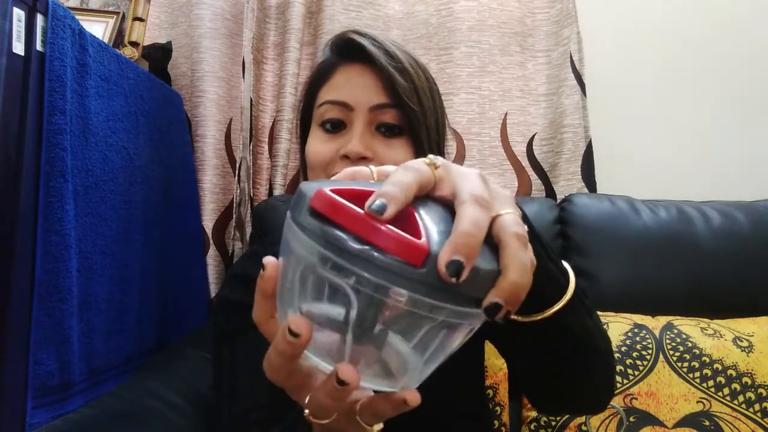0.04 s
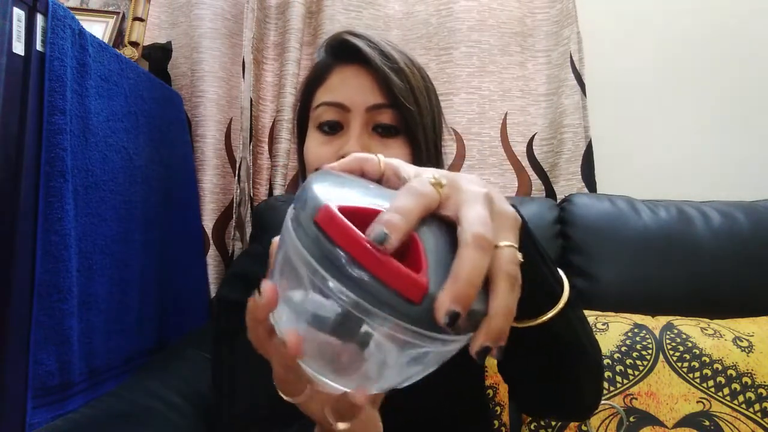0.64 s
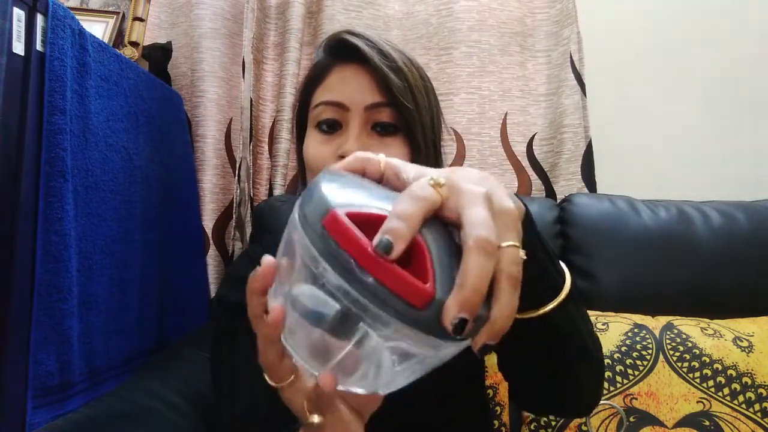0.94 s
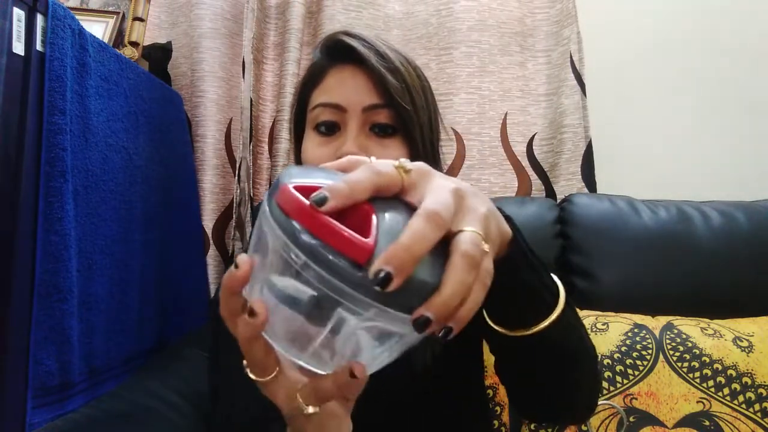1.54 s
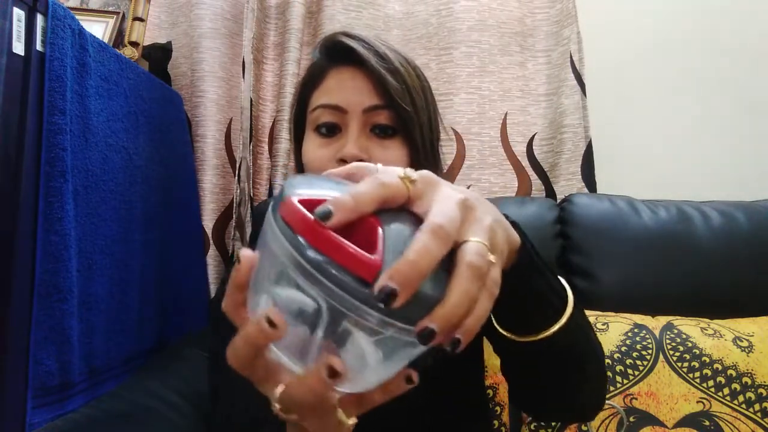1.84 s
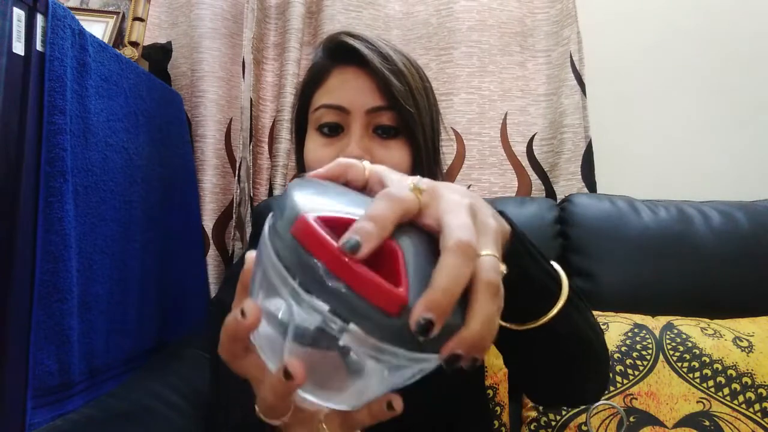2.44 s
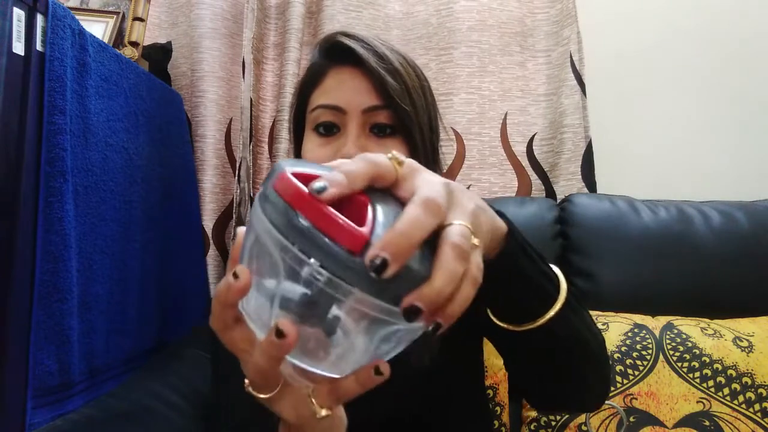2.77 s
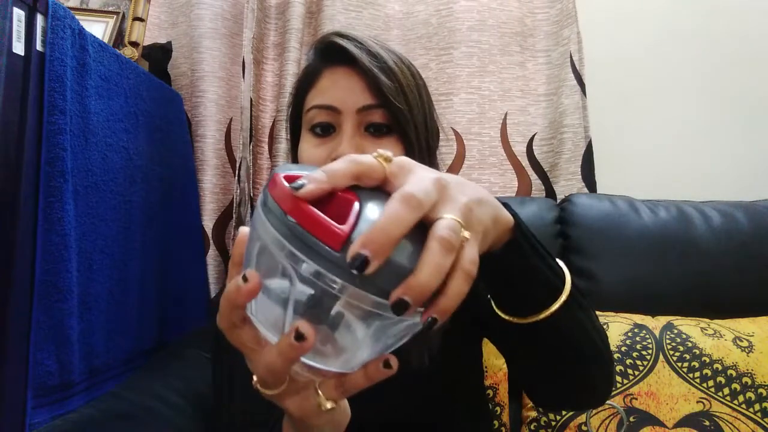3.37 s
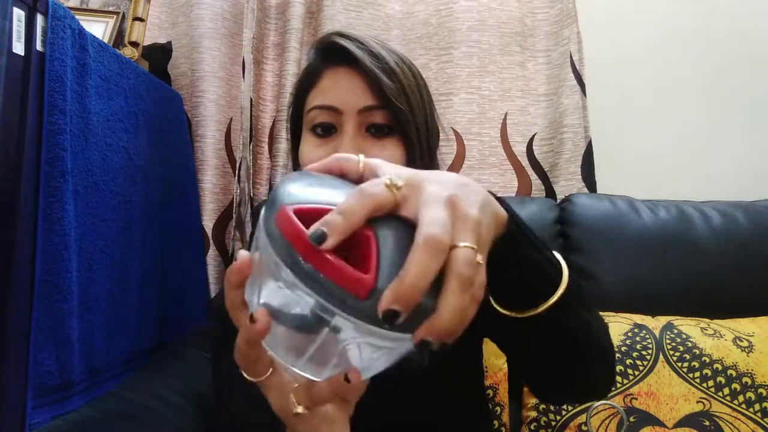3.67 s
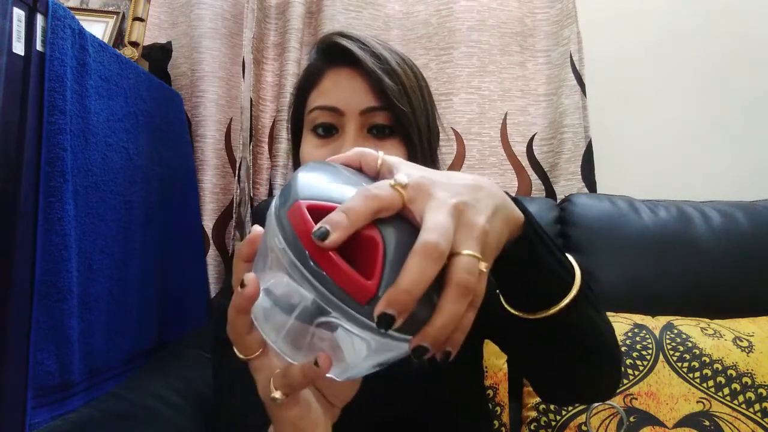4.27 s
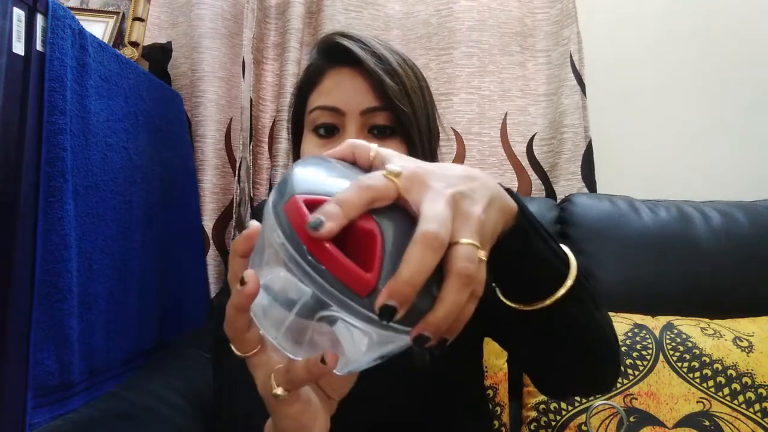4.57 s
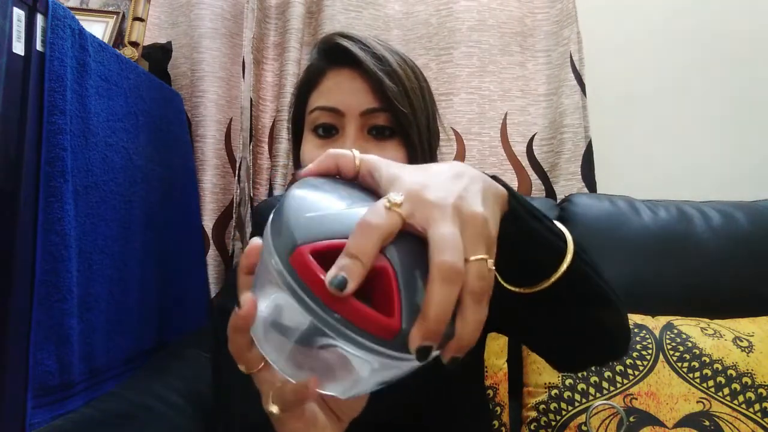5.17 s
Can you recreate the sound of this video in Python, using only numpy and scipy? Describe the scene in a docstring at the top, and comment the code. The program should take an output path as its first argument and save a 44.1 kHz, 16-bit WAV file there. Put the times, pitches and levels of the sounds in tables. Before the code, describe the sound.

A plastic lid is twisted onto a hand-held plastic bowl, heard fairly close in a small living room. After a faint dry hiss, a hollow knock sounds at about 0.4 seconds. Light ticks follow near 0.8, then two sharper clacks at 1.0 and 1.2. The rims rub softly until about 1.9. At 2.3 the lid catches and jumps with a loud cluster of clicks and a very quick chatter, and clacks again at 2.5. A strong, short knock lands at 2.9. A brief scrape and lighter click come at 3.5, another loud clack at 3.8, and a smaller knock at 4.2. A faint tap at 4.6 leads to thin fingernail ticks and a soft knock around 5.2 seconds. Each contact has a short room echo, over quiet steady air and a very faint motor hum.

```python
"""A faint dry hiss, then hollow knocks and sharp clicks: a plastic lid twisted onto a hand-held bowl.
Its lugs catch and jump; each contact knocks the plastic bowl, cracks its thin walls and snaps the rim.
Rim slides on rim with each wrist stroke, the lid chatters once, fingernails tick on it.
A small living room answers every click, over still air and a faint motor hum."""
import sys
import numpy as np
from scipy import signal
from scipy.fft import rfft, irfft
from scipy.io import wavfile

SR = 44100
rng = np.random.default_rng(int(sys.argv[2]) if len(sys.argv) > 2 else 0)


def digitize_waveform(pressure):
    """Quantize a signal to 16-bit integers and store it at the path in sys.argv[1].

    Rows of a 2-D input are taken as channels; values are limited to [-1, 1].
    """
    field = np.atleast_2d(pressure).T
    bounded = np.clip(field, -1, 1)
    quanta = np.round(bounded * 32767).astype(np.int16)
    wavfile.write(sys.argv[1], SR, quanta)


N = 234419
TIME_S = np.arange(N) / SR

# lid meets bowl; the grip sets the knock's pitch and damping:
# start_s, knock_hz, knock_db, knock_t60_s, crack_db, snap_db
CONTACTS = [ (0.436, 507, -16.5, 0.036, -21, -40), (0.764, 340, -32.5, 0.022, -43, -54),
            (0.879, 1120, -33.5, .01, -46.5, -57), (1.0205, 596, -14, 0.028, -31, -46),
            (1.0235, 656, -22, 0.025, -19.5, -33), (1.027, 324, -29, 0.037, -25.5, -22.5),
            (1.035, 964, -25.5, 0.021, -22.5, -31), (1.1636, 542, -14.5, 0.025, -17.5, -20),
            (1.1643, 328, -20.5, 0.046, -33, -45), (2.327, 594, -22.5, 0.042, -26.5, -50),
            (2.3368, 556, -11, 0.021, -16.5, -16.5), (2.3393, 720, -9.5, 0.054, -10.5, -12),
            (2.3466, 530, -19, 0.045, -21, -18), (2.4545, 479, -15.5, 0.063, -26, -24),
            (2.4566, 503, -12.5, 0.037, -16.5, -15), (2.4615, 917, -17.5, .019, -31, -27),
            (2.7619, 497, -25, 0.023, -36.5, -61), (2.872, 498, -38, 0.31, -66, -72),
            (2.9044, 284, -26, 0.03, -26, -26), (2.9062, 750, -3.5, 0.013, -12, -16),
            (3.5027, 570, -21.5, 0.011, -34.5, -34.5), (3.6242, 497, -45.5, 0.083, -42, -40),
            (3.812, 576, -25, 0.061, -34, -52.5), (3.8246, 565, -4.5, 0.03, -9, -14.5),
            (3.8258, 1100, -17, 0.029, -20.5, -36.5), (3.841, 497, -10, 0.012, -21.5, -36),
            (4.132, 520, -33, 0.025, -43.5, -60), (4.1648, 372, -31.5, 0.074, -29.5, -25.5),
            (4.1669, 485, -14.5, 0.022, -19, -41), (4.6232, 327, -34.5, 0.02, -40.5, -71),
            (5.2571, 318, -28, .044, -28, -36)]


def from_db(db):
    """Decibels to gain."""
    return 10 ** (np.asarray(db) / 20)


def unit_rms(x):
    """Scale to rms 1."""
    return x / np.sqrt(np.mean(x ** 2) + 1e-20)


def at_hz(table, hz):
    """Read a table on a log-frequency axis."""
    table_hz, values = np.transpose(table)
    return np.interp(np.log(np.maximum(hz, 1)), np.log(table_hz), values)


def bin_gains(spectrum, size):
    """Gain of a spectrum at each FFT bin."""
    return from_db(at_hz(spectrum, np.fft.rfftfreq(size, 1 / SR)))


def coloured(noise, spectrum):
    """Give noise a spectrum; rms 1."""
    return unit_rms(irfft(rfft(noise) * bin_gains(spectrum, len(noise)), len(noise)))


def click(spectrum, size):
    """Minimum-phase pulse with a given spectrum; energy 1."""
    cepstrum = irfft(np.log(bin_gains(spectrum, size)), size)
    pulse = irfft(np.exp(rfft(2 * cepstrum[:size // 2], size)), size)
    return unit_rms(pulse) / np.sqrt(size)


def decay(t, t60_s):
    """Envelope losing 60 dB in t60_s."""
    return np.exp(-np.log(1000) * t / t60_s)


def rise(t, rise_s):
    """Exponential onset from 0 to 1."""
    return 1 - np.exp(-t / rise_s)


def butter(x, order, hz, kind="low"):
    """Butterworth filter."""
    return signal.sosfilt(signal.butter(order, np.minimum(hz, .45 * SR), kind, fs=SR, output="sos"), x)


def add(out, start_s, sound):
    """Mix a sound in at start_s."""
    i = int(start_s * SR)
    out[i:i + len(sound)] += sound[:len(out) - i]


def air_and_hum(air_db=-62, hum_width_hz=15.8):
    """Steady room air; a motor hums in two wavering tones."""
    air_spectrum = [(12, -17), (20, 1.5), (146, -10.5), (210, -15.5), (248, -18), (434, -13.5), (607, -17),
                    (738, -14.5), (1260, -17.5), (2020, -17.5), (2390, -22), (2910, -23), (3630, -24),
                    (13200, -27.5), (16000, -27.5)]   # still air: freq_hz, density_db
    hum_tones = [(198, -69), (590, -70.5)]   # motor: pitch_hz, level_db
    out = from_db(air_db) * coloured(rng.standard_normal(N), air_spectrum)
    radius = np.exp(-np.pi * hum_width_hz / SR)
    for hz, db in hum_tones:
        resonator = [1, -2 * radius * np.cos(2 * np.pi * hz / SR), radius * radius]
        out += from_db(db) * unit_rms(signal.lfilter([1], resonator, rng.standard_normal(N)))
    return out


def room_response(build_s=0.0007, echo_top_hz=900, size=28000):
    """Diffuse tail, dying faster in the treble, plus two dull wall echoes."""
    decay_times = [(150, 0.57), (500, 0.52), (1000, 0.52), (2500, 0.5), (7000, 0.44), (15000, 0.33)]   # reverberation time: freq_hz, t60_s
    tail_levels = [(150, -7), (320, -8), (520, -10.5), (800, -8), (1300, -2), (2000, -4.5), (4000, -3.5),
                   (7000, -6), (15000, -5.5)]   # tail over direct sound: freq_hz, level_db
    echoes = [(.029, -18.5), (.084, -27.5)]   # wall returns: delay_s, level_db
    t, response = TIME_S[:size], np.zeros(size)
    edges_hz = np.geomspace(100, 17000, 19)
    for low, high in zip(edges_hz, edges_hz[1:]):
        hz = np.sqrt(low * high)
        band = butter(rng.standard_normal(size), 2, [low, high], "band")
        tail = unit_rms(band * decay(t, at_hz(decay_times, hz)) * rise(t, build_s))
        response += from_db(at_hz(tail_levels, hz)) * tail * np.sqrt(2 * (high - low) / SR / size)
    dull_pulse = butter(signal.unit_impulse(size), 2, echo_top_hz)
    for delay_s, db in echoes:
        add(response, delay_s, from_db(db) * dull_pulse)
    return response


def rim_speed(skid_db=-20, swell_s=0.0047, fade_s=0.0074):
    """Rim speed as hiss gain: a bell per wrist stroke, a brief skid around each tabled contact."""
    wrist_strokes = [(0.0, -59.5, 0.096), (0.423, -59.5, 0.19), (0.67, -53.5, 0.038), (0.768, -50, 0.046),
                     (1.02, -50.5, 0.072), (1.392, -51, 0.061), (1.504, -50.5, 0.058),
                     (1.636, -53.5, 0.085), (1.783, -55.5, 0.076), (1.89, -64, 0.081), (2.333, -42, 0.059),
                     (2.88, -50.5, 0.079), (3.505, -44.5, 0.077), (3.631, -51.5, 0.023),
                     (3.784, -56.5, 0.072), (4.155, -50.5, 0.03), (5.14, -52, 0.064), (5.252, -50, .05)]   # turns of the lid: middle_s, level_db, length_s
    strokes = sum(from_db(db) * np.exp(-(2 * (TIME_S - middle_s) / length_s) ** 2)
                  for middle_s, db, length_s in wrist_strokes)
    skids = np.zeros(N)
    for start_s, *_, crack_db, _ in CONTACTS:
        t = TIME_S - start_s
        skids += from_db(crack_db + skid_db) * np.exp(-np.maximum(-t / swell_s, t / fade_s))
    return np.hypot(strokes, skids)


def rim_hiss(grain_scatter_db=3.0, grain_samples=32, gain_db=0.5):
    """Tiny asperities of uneven size catch and slip as rim slides on rim."""
    spectrum = [(100, -27), (250, -6.5), (500, 1), (800, -8), (1400, -8.5), (2000, -8.5), (3000, -13.5),
                (5000, -17), (6000, -12.5), (6900, -5.5), (8500, -20), (11000, -21.5), (15000, -14.5),
                (16000, -12)]   # rim friction: freq_hz, density_db
    noise = rng.standard_normal(N)
    grain_db = grain_scatter_db * np.repeat(rng.standard_normal(N), grain_samples)[:N]
    return from_db(gain_db) * rim_speed() * coloured(noise * from_db(grain_db), spectrum)


def nail_ticks(t60_s=0.0044, rise_s=0.00043, size=2048):
    """Fingernails tick on the lid, too lightly to move the bowl."""
    ticks = [(0.774, -22), (2.1035, -33), (5.1578, -16), (5.2571, -20.5)]   # nail contacts: start_s, level_db
    spectrum = [(2500, -37), (4500, -14), (5800, -10), (7000, 8), (7700, -9), (8800, -21), (12000, -17.5),
                (15500, -11)]   # nail on plastic: freq_hz, density_db
    out, t = np.zeros(N), TIME_S[:size]
    for start_s, db in ticks:
        noise = coloured(rng.standard_normal(size), spectrum)
        add(out, start_s, from_db(db) * noise * decay(t, t60_s) * rise(t, rise_s))
    return out


def lug_chatter(start_s=2.368, gap_s=.0056, jitter_s=.0001, scatter_db=2, count=4):
    """Contact rows for a quick, almost even run of soft rebounds after a big jump."""
    # one rebound: knock_hz, knock_db, knock_t60_s, crack_db, snap_db
    rebound = (714, -18.5, 0.01, -29, -30)
    hz, knock_db, t60_s, crack_db, snap_db = rebound
    offsets = rng.standard_normal((count, 2)) * [jitter_s, scatter_db]
    return [(start_s + k * gap_s + late_s, hz, knock_db + db, t60_s, crack_db + db, snap_db + db)
            for k, (late_s, db) in enumerate(offsets)]


def rim_snap(t, blow_db=1.5, ring_db=-6.5, t60_s=0.021):
    """An edge flicks off a lug: a very short burst near 7 kHz."""
    spectrum = [(1500, -27), (4000, -7), (5500, -8.5), (6400, 2.5), (7000, 6.5), (7500, -5.5), (8300, -18),
                (12000, -21), (15300, -16), (17000, -3)]   # fine modes of the stiff rim: freq_hz, density_db
    ring = from_db(ring_db) * coloured(rng.standard_normal(len(t)), spectrum) * decay(t, t60_s)
    return from_db(blow_db) * click(spectrum, len(t)) + ring


def wall_crack(t, blow_db=9.0, modes_db=-4.0, scatter_db=2.5, fine_db=-7.5, fine_t60_s=0.022):
    """A sharp blow rings fine modes and bending modes; the contact point sets a random bending mix."""
    bending_modes = [(194, -20.5, 0.046), (390, -13.5, 0.047), (693, -10, 0.042), (858, -11, 0.043),
                     (1000, -9.5, 0.036), (1271, -13.5, 0.029), (1587, -17, .03), (1919, -9.5, 0.039),
                     (2396, -22.5, 0.039), (2470, -15, 0.019), (3027, -15.5, 0.035), (3257, -16.5, 0.033),
                     (3556, -14.5, 0.02), (4420, -15, 0.014), (4660, -15.5, 0.02)]   # lid and bowl: pitch_hz, level_db, t60_s
    spectrum = [(100, -26), (300, -21), (700, -5.5), (1100, -0.5), (1600, -0.5), (2200, 4), (3000, -10.5),
                (5000, -8.5), (8000, -6), (15000, -22)]   # fine modes of the walls: freq_hz, density_db
    hz, db, t60_s = np.transpose(bending_modes)[:, :, None]
    gains = from_db(db + modes_db - scatter_db * rng.standard_normal(hz.shape))
    signs = rng.choice([-1, 1], hz.shape)
    bending = np.sum(gains * signs * np.sin(2 * np.pi * hz * t) * decay(t, t60_s), axis=0)
    fine = from_db(fine_db) * coloured(rng.standard_normal(len(t)), spectrum) * decay(t, fine_t60_s)
    return from_db(blow_db) * click(spectrum, len(t)) + bending + fine


def bowl_knock(t, hz, t60_s, rise_s=0.00089):
    """The bowl's main mode swells over the contact time and is damped by the hands."""
    return np.sin(2 * np.pi * hz * t) * decay(t, t60_s) * rise(t, rise_s)


def lid_contacts(rows, crack_top_hz=5600, snap_db_per_octave=18, radiation_hz=130, size=3072):
    """Each contact sounds bowl, walls and rim together; so small a bowl radiates little bass."""
    out, t = np.zeros(N), TIME_S[:size]
    for start_s, hz, knock_db, t60_s, crack_db, snap_db in rows:
        # a hard contact snaps more and cracks brighter
        top_hz = crack_top_hz * 2 ** ((snap_db - crack_db) / snap_db_per_octave)
        knock = from_db(knock_db) * bowl_knock(t, hz, t60_s)
        crack = from_db(crack_db) * butter(wall_crack(t), 2, top_hz)
        snap = from_db(snap_db) * rim_snap(t)
        add(out, start_s, knock + crack + snap)
    return butter(out, 2, radiation_hz, "high")


def scene(nail_send_db=-6.5, hiss_send_db=0.5, face_count=3):
    """Each face of the bowl radiates its own mix of modes; one is heard directly, all feed the room."""
    rows = CONTACTS + lug_chatter()
    faces = [lid_contacts(rows) for _ in range(face_count)]
    hiss, ticks = rim_hiss(), nail_ticks()
    send = from_db(hiss_send_db) * hiss + from_db(nail_send_db) * ticks
    tails = [signal.oaconvolve(face + send, room_response())[:N] for face in faces]
    room = sum(tails) / np.sqrt(face_count)
    return (faces[0] + hiss + ticks + room + air_and_hum())[None]


def record(dry):
    """Steep low-pass at 15.9 kHz."""
    return signal.sosfilt(signal.ellip(10, .1, 70, 15900, fs=SR, output="sos"), dry)


dry = scene()
out = record(dry)
digitize_waveform(out)
```